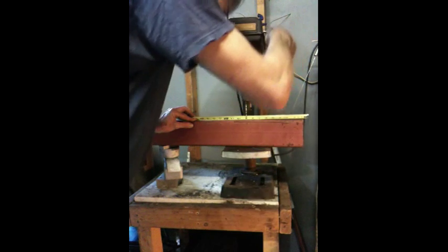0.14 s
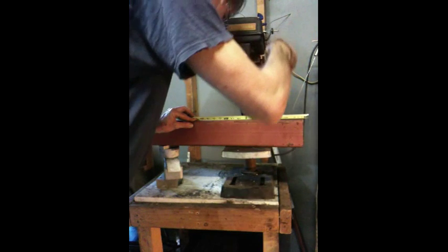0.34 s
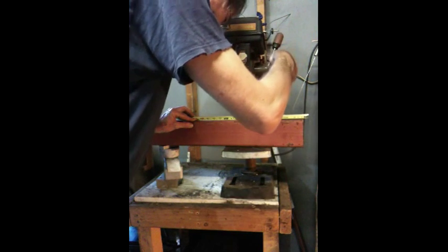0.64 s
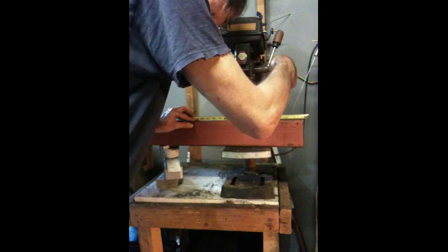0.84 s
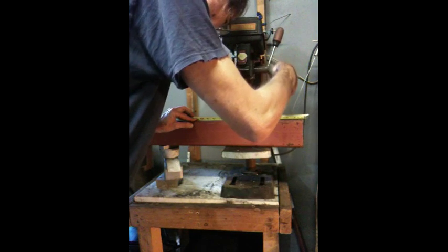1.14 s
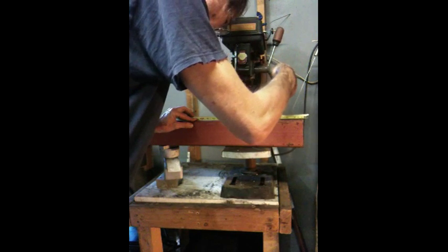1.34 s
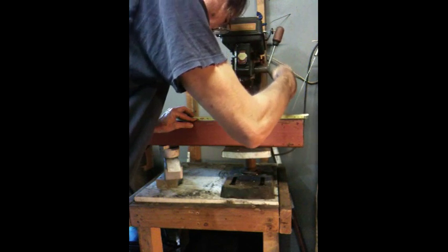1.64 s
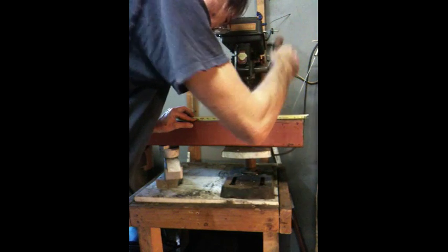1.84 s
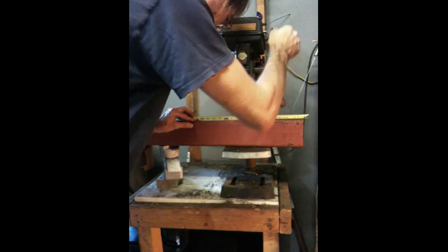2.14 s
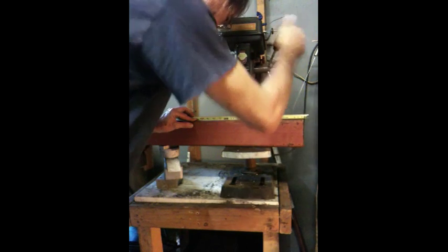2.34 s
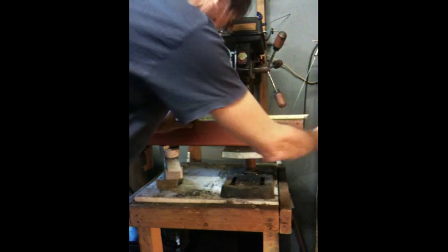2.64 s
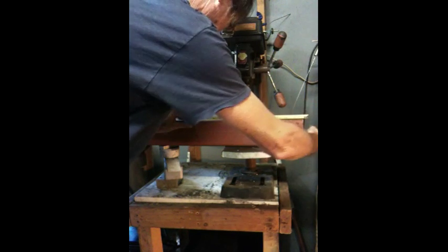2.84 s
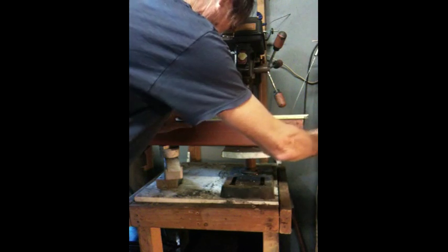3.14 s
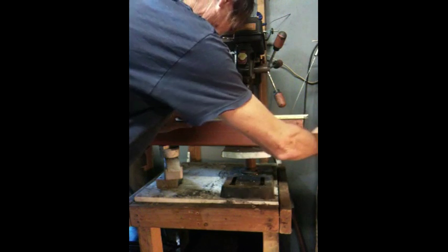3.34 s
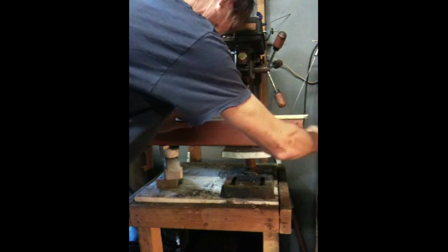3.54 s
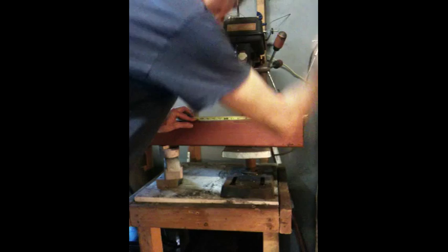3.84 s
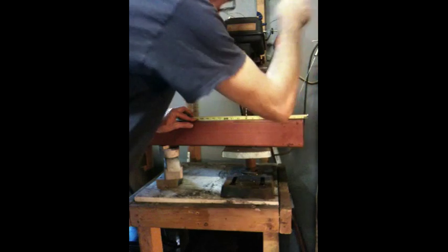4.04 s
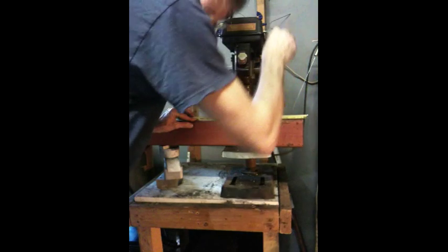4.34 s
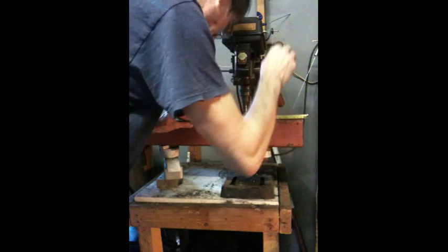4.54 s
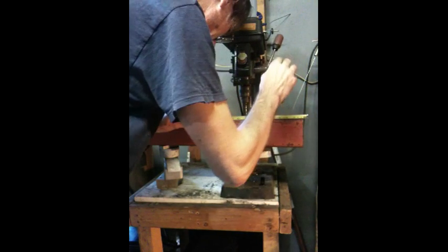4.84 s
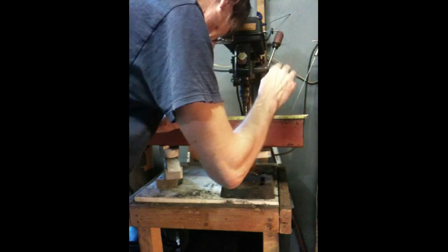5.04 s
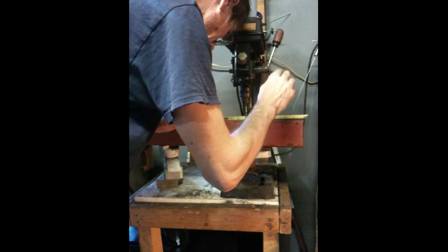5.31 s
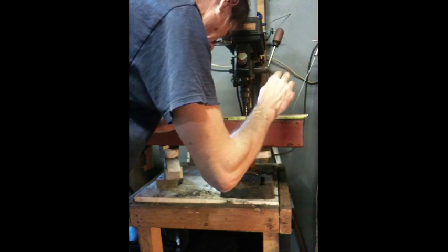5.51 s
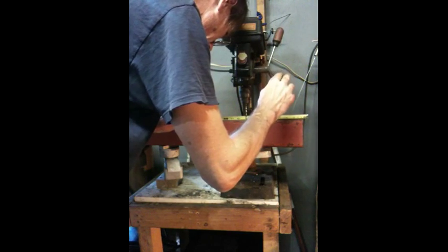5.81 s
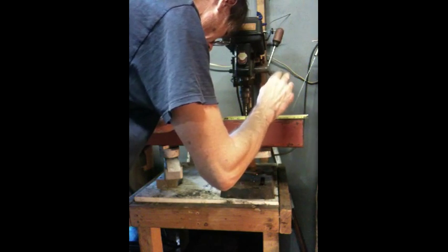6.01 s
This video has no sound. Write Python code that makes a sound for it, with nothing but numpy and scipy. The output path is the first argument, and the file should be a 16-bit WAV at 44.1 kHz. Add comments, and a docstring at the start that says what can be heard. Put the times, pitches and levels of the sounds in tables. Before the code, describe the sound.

A belt-driven drill press drones and throbs steadily in a small workshop after an opening metallic clatter, with faint soft thuds later.

```python
"""First a quill slides up and knocks on its stop, over the drone of a belt-driven drill press in a small workshop.
Later come a brush of cloth and a few soft thuds, as someone works the feed handle.
The drone and the ringing head are noise shaped by resonances; the drone throbs with each lap of the belt.
The spindle and motor hum are sine waves; the bearing whirr and the belt and fan hiss are filtered noise.
Knocks are fading sines with a clatter of noise, rubs are short noise swishes, thuds are short rising tones."""
import sys
import numpy as np
from scipy import signal
from scipy.fft import rfft, irfft
from scipy.io import wavfile

SR = 44100
rng = np.random.default_rng(int(sys.argv[2]) if len(sys.argv) > 2 else 0)


def output_pcm(signal):
    """Save a mono or channel-first signal as 16-bit PCM at the path in sys.argv[1].

    Samples are clipped to [-1, 1] before scaling.
    """
    pcm = np.clip(np.atleast_2d(signal).T, -1, 1) * 32767
    wavfile.write(sys.argv[1], SR, np.round(pcm).astype(np.int16))


N = 272097
TIME = np.arange(N) / SR
FREQS = np.fft.rfftfreq(N, 1 / SR)

SPINDLE_HZ = 47.63  # turns of the spindle per second, before a slight drift
MAINS_HZ = 60.0
BELT_LAPS_HZ = 2.441  # laps of the belt per second
EDGE_HZ = 15690  # upper limit of the sound


def amp(db):
    """Turns decibels into a gain."""
    return 10 ** (np.asarray(db) / 20)


def unit(x):
    """Scales a signal to an rms (average strength) of one."""
    return x / np.sqrt(np.mean(x ** 2) + 1e-20)


def noise(gain):
    """Noise of rms one, shaped by a gain at each frequency."""
    spectrum = rfft(rng.standard_normal(N)) * gain
    return unit(irfft(spectrum, N))


def colour(points):
    """Gain at each frequency, drawn through (frequency [Hz], gain [dB]) points."""
    hz, db = np.transpose(points)
    return amp(np.interp(np.log(FREQS + 1), np.log(hz), db))


def curve(points):
    """Level in dB at each moment, drawn through (time [s], level [dB]) points."""
    return np.interp(TIME, *np.transpose(points))


def bump(middle, half):
    """A smooth rise and fall around a middle time, both in seconds."""
    return np.exp(-((TIME - middle) / half) ** 2)


def resonance(hz, width):
    """Gain of a part that rings at one frequency, with steep skirts."""
    return 1 / (1 + ((FREQS - hz) / (0.78 * width)) ** 2)


def wander(rate_hz):
    """A slow random wandering of rms one; a higher rate wanders faster."""
    return noise(np.exp(-(FREQS / rate_hz) ** 2))


# The two close resonances of the drone: (frequency [Hz], width [Hz], relative level [dB])
DRONE_RESONANCES = [(680.3, 18.6, -1.5), (697, 56, -8.5)]
# Slow swell of the drone, before the trim and the belt's lift: (time [s], level [dB])
DRONE_SWELL = [(0, -49), (1, -45), (2.1, -46), (3.05, -46), (3.6, -44), (4.4, -43.5), (5.2, -47),
               (6.17, -47)]


def drone(trim_db=-0.5, evenness=0.51):
    """Two close resonances beat into a quick flutter, which surges in time with the laps of the belt."""
    ring = unit(sum(amp(db) * noise(resonance(hz, width)) for hz, width, db in DRONE_RESONANCES))
    # the steady drive keeps the strength fairly even over a tenth of a second
    power = signal.fftconvolve(ring ** 2, np.hanning(5000), "same")
    flutter = unit(ring / (abs(power) + 1e-9) ** (evenness / 2))
    return flutter * belt() * amp(curve(DRONE_SWELL) + trim_db)


# Stiff spots of the belt, which reach the pulley once a lap:
# (middle, counted from the lap's start [s], half length [s], average lift of the drone [dB])
STIFF_SPOTS = [(.089, 0.011, 3.5), (0.206, 0.021, 5.5), (.277, .02, 6)]


def belt(spread_db=1.0):
    """Gain of the drive: each stiff spot lifts it on every lap, by an amount that varies by chance."""
    lift_db = np.zeros(N)
    for lap_start in np.arange(0, N / SR, 1 / BELT_LAPS_HZ):
        for middle, half, db in STIFF_SPOTS:
            this_lift = db + spread_db * rng.standard_normal()
            lift_db += this_lift * bump(lap_start + middle, half)
    return amp(lift_db)


# Ringing of the head and belt guard: (frequency [Hz], width [Hz], level [dB])
HEAD_RESONANCES = [(228, 8.4, -73), (334.5, 16.6, -62), (425.3, 27, -59), (498, 34, -65),
                   (560.6, 27, -56.5), (649, 39, -54), (1728, 18, -66.5), (1926, 33, -65.5),
                   (2397, 31, -73), (2670, 14, -77), (3160, 25, -77), (3640, 36, -71), (4170, 110, -70.5)]
# Tone colour of the running machine's rumble: (frequency [Hz], relative gain [dB])
RUMBLE_COLOUR = [(20, -59), (45, -53), (90, -17), (150, -7.5), (200, -1), (310, -2.5), (380, -6.5),
                 (480, -4.5), (620, -1.5), (740, 4.5), (820, -0.5), (930, -5.5), (970, -9.5), (1100, -26.5)]


def head(rumble_db=-55.5):
    """The bearings shake the casting and the guard, which ring at their resonances over a rumble."""
    rings = sum(amp(db) * noise(resonance(hz, width)) for hz, width, db in HEAD_RESONANCES)
    rumble = amp(rumble_db) * noise(colour(RUMBLE_COLOUR))
    return rings + rumble


# Spindle tones: (multiple of the spindle speed, level [dB])
SPINDLE_TONES = [(3, -71), (5, -72.5), (6, -59), (7, -72), (9, -66.5), (11, -73.5), (15, -53), (45, -64.5)]


def hum(drift=0.00036, waver_db=1.0, mains_db=-69):
    """Spindle tones follow a drifting speed, motor iron hums at twice the mains; also returns the turns."""
    speed = SPINDLE_HZ * (1 + drift * wander(1.18))
    turns = np.cumsum(speed) / SR
    out = amp(mains_db) * unit(np.sin(2 * np.pi * 2 * MAINS_HZ * TIME))
    for order, db in SPINDLE_TONES:
        tone = np.sin(2 * np.pi * (round(order) * turns + rng.random()))
        out = out + amp(db) * unit(tone * amp(waver_db * wander(6.8)))
    return out, turns


# Tones of the quill's stop: (frequency [Hz], relative level [dB], time to fade by 60 dB [s])
# Each knock multiplies the fading times by its own factor.
STOP_TONES = [(335, -25, 0.11), (409, -18.5, 0.61), (508, -18, 0.2), (657.4, -1, 0.24), (810, -26, 0.073),
              (2120, -19.5, 0.28), (2400, -26, 0.5), (3122, -26, 0.18), (3758, -23.5, 0.16),
              (4000, -29, .12), (4470, -26, 0.12), (4830, -27, 0.13)]
# Tone colour of a knock's clatter: (frequency [Hz], relative gain [dB])
CLATTER_COLOUR = [(50, -45), (150, -26), (400, 6), (750, -9), (1100, -22.5), (1600, -8.5), (2200, -2),
                  (2800, -11), (4000, -9.5), (6000, -20), (9000, -31), (15000, -39)]
# Knocks of the quill: (time [s], ring level [dB], clatter level [dB], factor on the fading times)
QUILL_KNOCKS = [(.001, -29.5, -57, 0.77), (.052, -21, -44, 0.23), (.082, -21, -62, 0.32),
                (.200, -27, -35.5, 0.24), (.208, -19.5, -36, 0.92)]


def knocks(clatter_t60=0.28):
    """Each knock rings the stop and the head; ring and clatter build up within milliseconds, then fade."""
    out = np.zeros(N)
    for start, ring_db, clatter_db, decay in QUILL_KNOCKS:
        age = np.maximum(TIME - start, 0)
        ring = np.zeros(N)
        for hz, db, t60 in STOP_TONES:
            fade = amp(db - 60 * age / (t60 * decay))
            ring += fade * np.sin(2 * np.pi * (hz * age + rng.random()))
        clatter = noise(colour(CLATTER_COLOUR)) * amp(-60 * age / (clatter_t60 * decay))
        build_up = 1 - np.exp(-age / 0.004)  # also keeps it silent before the knock
        out += build_up * (amp(ring_db) * ring + amp(clatter_db) * clatter)
    return out


# Soft thuds: (middle time [s], half length [s], level [dB], middle pitch [Hz], rise [octaves per s])
HANDLE_THUDS = [(0.097, 0.029, -49, 228.2, 2.4), (3.705, .018, -52.5, 231, 22),
                (3.766, .028, -57, 288, 1.5), (3.884, 0.023, -48.5, 288, 6), (4.03, 0.0193, -49, 251, 10),
                (4.274, 0.016, -50, 290, 3)]


def thuds(rough=0.22):
    """Dull, short, rising creaks as the handle is moved; uneven slipping roughens them."""
    out = np.zeros(N)
    for middle, half, db, hz, glide in HANDLE_THUDS:
        pitch = hz * 2 ** (glide * np.clip(TIME - middle, -2 * half, 2 * half))
        tone = np.sqrt(2) * np.sin(2 * np.pi * np.cumsum(pitch) / SR)
        note = tone * (1 + rough * wander(70))
        out += amp(db) * note * bump(middle, half)
    return out


# Sliding and brushing; a narrow one rings a single resonance:
# (middle time [s], half length [s], level [dB], centre frequency [Hz], width [octaves])
SWISHES = [(0.02, 0.053, -51, 5300, 0.74), (0.026, 0.051, -52.5, 4050, 0.062),
           (0.099, 0.024, -55, 212, 0.48), (3.097, 0.18, -54.5, 419, 0.028),
           (3.384, 0.023, -58, 7250, 0.39), (3.773, 0.13, -52.5, 288, 0.56)]


def rubs():
    """Short swishes of noise from the sliding quill and from a sleeve."""
    out = np.zeros(N)
    for middle, half, db, hz, octaves in SWISHES:
        band = np.exp(-(np.log2((FREQS + 1) / hz) / octaves) ** 2 / 2)
        out += amp(db) * noise(band) * bump(middle, half)
    return out


# Tone colour of the bearing whirr: (frequency [Hz], relative gain [dB])
WHIRR_COLOUR = [(1000, -37), (1110, -24.5), (1270, -19), (1400, -15), (1650, -6.5), (1900, -0.5), (2170, 2),
                (2380, -3.5), (2520, -8.5), (2900, -14), (3500, -19), (5000, -46)]
# Tone colour of the belt and fan hiss: (frequency [Hz], relative gain [dB])
HISS_COLOUR = [(1100, -26), (2800, -5.5), (3480, -8.5), (3680, 1.5), (4750, 1), (5000, -2.5), (5250, 1.5),
               (5900, 0), (7200, -5.5), (9200, -11.5), (10100, -13), (10700, -16.5), (13000, -23.5),
               (15400, -25)]
# The worker's body shades the whirr and hiss a little: (time [s], gain [dB])
BODY_SHADE = [(0, -0.5), (1.5, 0), (4.0, 0.5), (5.2, -0.45), (6.17, -.5)]


def air(turns, whirr_db=-51.0, hiss_db=-54.5, whirr_swell_db=0.5, hiss_swell_db=0.5):
    """The whirr pulses three times a turn over a smooth hiss; both swell a little together."""
    swell = wander(4.4)
    pulsing = 1 + 0.14 * np.cos(2 * np.pi * 3 * turns)
    whirr = noise(colour(WHIRR_COLOUR)) * pulsing * amp(whirr_db + whirr_swell_db * swell)
    hiss = noise(colour(HISS_COLOUR)) * amp(hiss_db + hiss_swell_db * swell)
    return (whirr + hiss) * amp(curve(BODY_SHADE))


def walls(x):
    """Close reflections from the walls and the bench, fading with age, ripple the spectrum of a sound."""
    age = np.arange(2200) / SR
    echoes = rng.standard_normal(len(age)) * np.exp(-age / 0.012)
    echoes = echoes * (age > 0.002)  # the first echo needs time to return
    echoes = echoes / np.linalg.norm(echoes)
    return x + amp(-16) * signal.fftconvolve(x, echoes)[:N]


def scene():
    """The running machine and the handling around it."""
    tones, turns = hum()
    machine = drone() + head() + tones
    handling = knocks() + thuds()
    return (machine + handling + walls(rubs() + air(turns)))[None]


def record(dry, notch_hz=1125, notch_width_hz=80, notch_db=-3.0):
    """A narrow dip between drone and whirr, then a filter that removes what lies above the upper limit."""
    dip = amp(notch_db * np.exp(-((FREQS - notch_hz) / notch_width_hz) ** 2))
    dipped = irfft(rfft(dry) * dip, N)
    taps = signal.firwin(1023, EDGE_HZ, window=("kaiser", 9), fs=SR)
    return signal.oaconvolve(dipped, taps[None], "same")


dry = scene()
out = record(dry)
output_pcm(out)
```